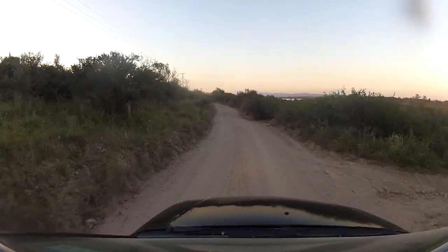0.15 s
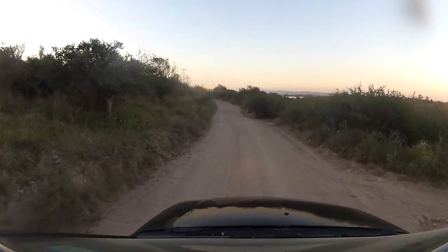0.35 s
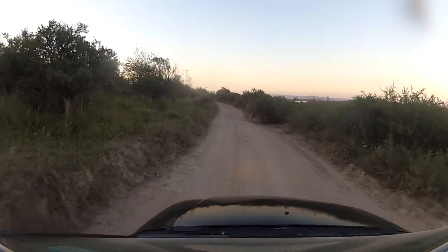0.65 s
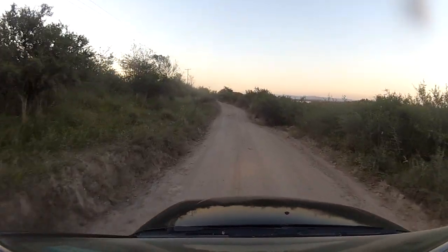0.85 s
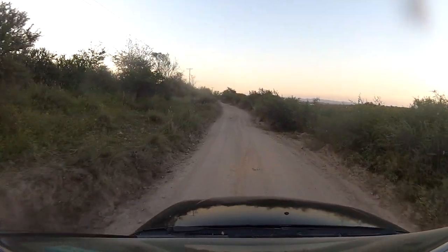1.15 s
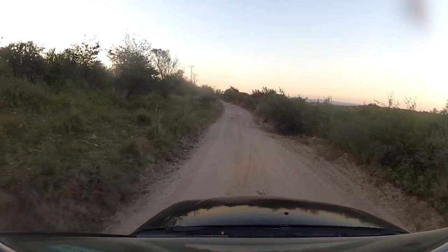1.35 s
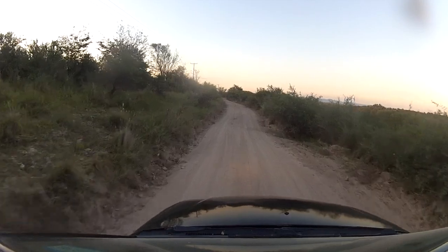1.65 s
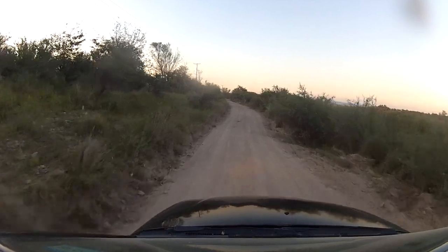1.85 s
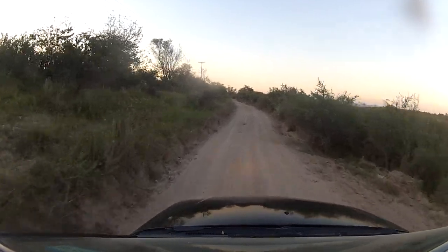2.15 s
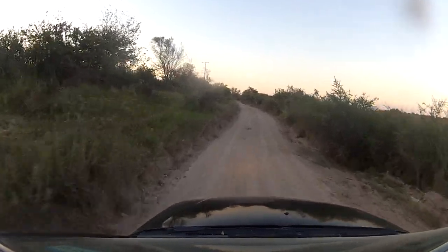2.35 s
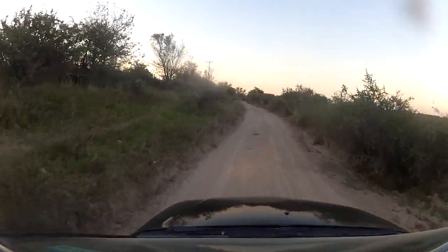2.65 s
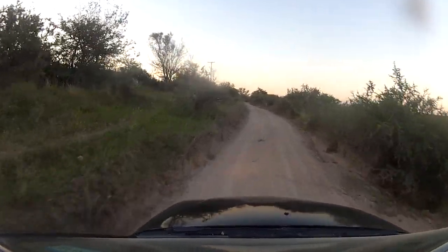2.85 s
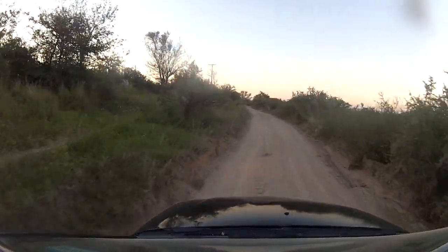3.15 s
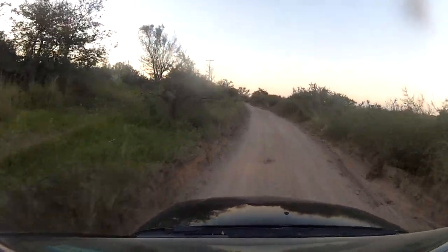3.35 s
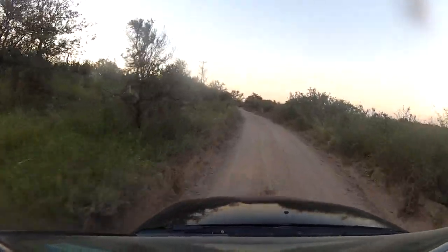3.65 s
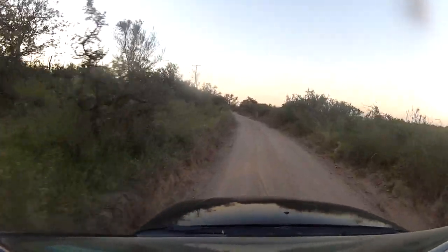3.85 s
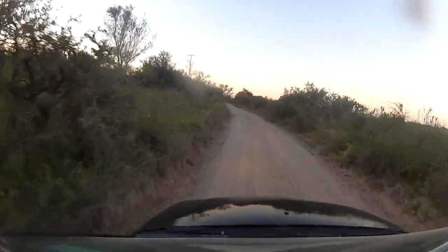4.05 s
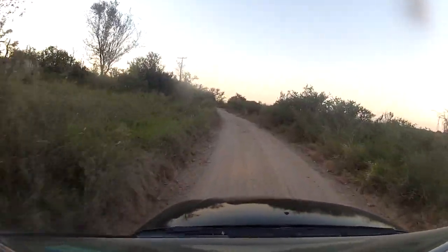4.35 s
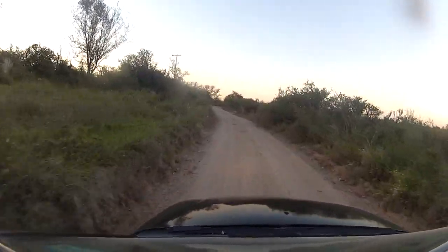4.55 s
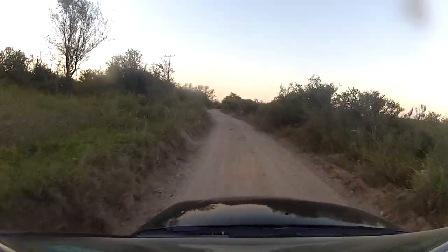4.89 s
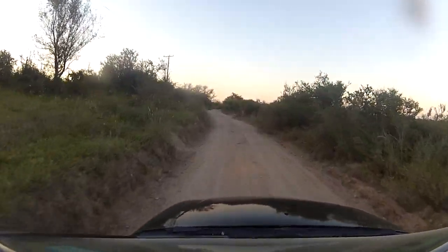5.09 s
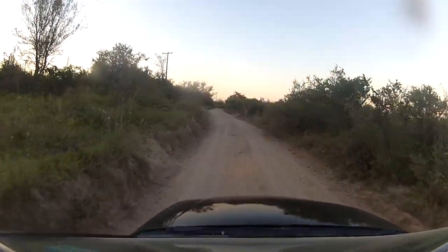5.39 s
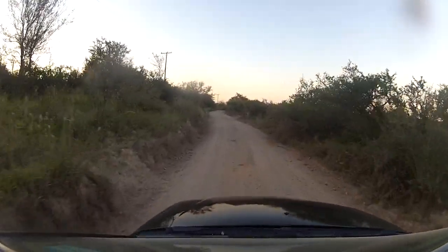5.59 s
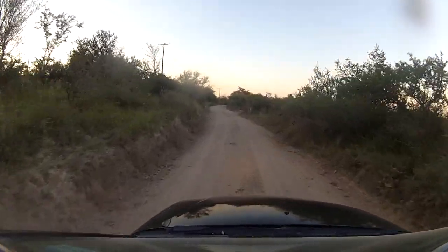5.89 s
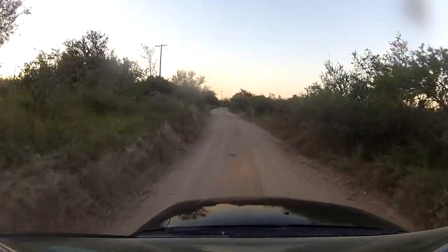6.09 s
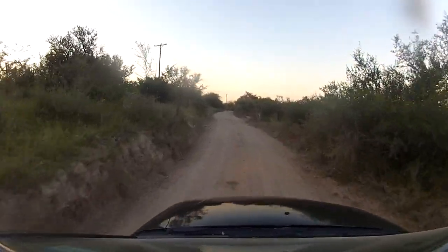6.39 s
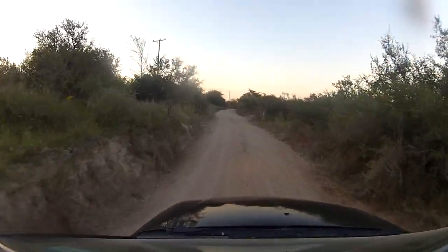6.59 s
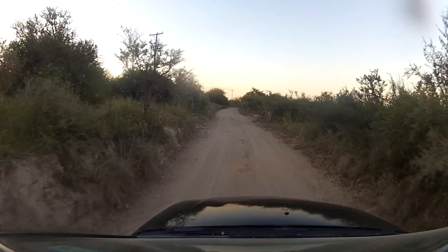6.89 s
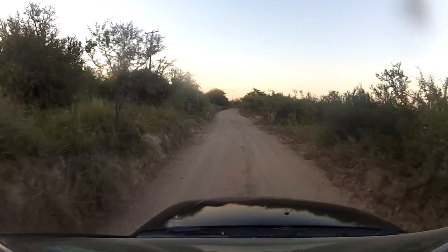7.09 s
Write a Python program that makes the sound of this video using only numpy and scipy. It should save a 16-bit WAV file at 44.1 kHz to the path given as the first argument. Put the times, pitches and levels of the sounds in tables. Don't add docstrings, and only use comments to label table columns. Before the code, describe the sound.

Close, boxy in-car sound of an unpaved road: violent hollow knocks at the start, steady rumble, faint tyre hiss, rapid case ticking and sharp single stone hits.

```python
import sys
import numpy as np
from scipy import signal
from scipy.io import wavfile
from scipy.ndimage import uniform_filter1d

SR = 44100
rng = np.random.default_rng(int(sys.argv[2]) if len(sys.argv) > 2 else 0)


def master_out(mix):
    frames = np.transpose(np.atleast_2d(mix))
    ceiling = np.clip(frames, -1, 1)
    pcm = np.round(ceiling * 32767).astype(np.int16)
    wavfile.write(sys.argv[1], SR, pcm)


def invert_db(level):
    return 10 ** (np.asarray(level, dtype=float) / 20)


N = 318843

# f/Hz, level/dB, t60/s
SHELL_MODES = [(643, 1, 0.05), (716, 8.5, 0.054), (930, 20, 0.046), (1110, -13, 0.019), (1300, 14, 0.045),
               (1600, 2, 0.0099), (2170, -19, 0.013)]
# t/s, peak level/dB, f/Hz
RUT_BLOWS = [(0.031, -19, 860), (0.1073, -18.5, 774), (0.1444, -9, 780), (0.1488, -2, 860),
             (0.1705, -6, 990), (0.2116, -12.5, 890), (0.2663, -25, 830), (0.3002, -28, 890),
             (0.3051, -6, 780), (0.3259, -10.5, 860), (0.4942, -7, 950), (0.4975, -1.5, 880),
             (0.5273, -5, 935), (0.5492, -24, 1050), (0.584, -16, 1010), (0.5886, -6, 765),
             (0.6008, -3, 930), (3.7345, -17.5, 910), (3.804, -12.5, 950), (3.809, -15, 745),
             (3.8227, -5.5, 950), (3.974, -37, 810), (3.9806, -13, 800), (3.9996, -13, 810),
             (4.0643, -8.5, 1040), (4.077, -12, 780), (4.081, -3.5, 990), (4.1023, -14, 1140),
             (4.107, -14.5, 770), (4.1202, -21, 814)]
# t/s, peak level/dB, f/Hz, 3.4 kHz ring level/dB
STONE_BLOWS = [(0.8477, -16.5, 1050, -34), (0.941, -20, 1050, -26.5), (1.2572, -22.5, 970, -37),
               (1.423, -13.5, 1290, -22.5), (1.505, -17.5, 795, -30), (1.7355, -18, 950, -27.5),
               (1.9978, -20, 950, -28), (2.1, -16, 990, -27.5), (2.643, -16, 1050, -25.5),
               (2.6781, -22, 1040, -30), (2.83, -9.5, 1090, -31.5), (2.9196, -16, 970, -27.5),
               (3.2912, -7, 1130, -26), (3.5688, -13, 1110, -25), (3.577, -25, 960, -39),
               (5.363, -10, 1030, -28.5), (5.5427, -10.5, 1020, -27.5), (5.6612, -5.5, 1050, -20),
               (5.7003, -10, 1050, -38), (5.916, -19, 1040, -40), (6.1522, -12.5, 990, -23.5),
               (6.2874, -20.5, 930, -41), (6.3509, -10.5, 1070, -32), (6.388, -15, 1110, -25),
               (6.3928, 0, 930, -17.5), (6.4222, -13, 910, -50), (6.628, -21, 950, -33),
               (6.7662, -11.5, 990, -37), (7.2168, -18.5, 1000, -28.5)]
# t/s, peak level/dB, f/Hz
FURTHER_BLOWS = [(0.19, -21, 900), (0.1955, -21, 800), (0.5622, -23, 900), (2.8401, -25.5, 900), (4.16, -23, 1030),
                 (4.216, -24.5, 910), (4.44, -40, 1486), (4.582, -35, 1600), (4.804, -30.5, 1290),
                 (6.365, -25, 800), (6.394, -4, 870), (0.164, -29, 650), (0.577, -31, 700), (3.688, -27, 800),
                 (3.764, -27, 900), (3.579, -23, 700), (4.514, -29, 700), (5.006, -26, 1000), (3.563, -31, 900),
                 (4.138, -34, 800)]


def knocks():
    sag_per_s = 17
    thud_hz, thud_db, thud_s = 300, -17, 0.002
    full_ring_db = -8.5
    out = np.zeros(N)
    blows = RUT_BLOWS + [row[:3] for row in STONE_BLOWS] + FURTHER_BLOWS
    chance = rng.standard_normal((len(blows), 14))
    t = np.arange(-150, 250) / SR
    after = np.arange(800) / SR
    bell = np.exp(-(t / np.where(t < 0, 0.00058, 0.00085)) ** 2)
    thud = -np.sin(2 * np.pi * thud_hz * after) * np.exp(-after / thud_s)
    for (at_s, level_db, pitch_hz), c in zip(blows, chance):
        blow = -bell * np.cos(2 * np.pi * pitch_hz * t * (1 - sag_per_s * t) + 0.35 * c[6])
        sharpness = 25 * np.log2(pitch_hz / 900)
        shell = [(hz, db + sharpness * np.log2(hz / 900), t60_s) for hz, db, t60_s in SHELL_MODES]
        tail = ring(shell, c, detune=0.025, spread_db=3)
        add(out, at_s - 150 / SR, invert_db(level_db + 1.5) * blow)
        add(out, at_s + 0.00069, invert_db(level_db + thud_db) * thud)
        add(out, at_s + 0.00043, invert_db(min(level_db, full_ring_db) + 8.0) * tail)
    return out


# f/Hz, level/dB, t60/s
CLACK_MODES = [
    [(3413, 2.5, 0.0063), (3900, -11, 0.014)],
    [(4860, 5, 0.0058), (4900, -10, 0.005)],
    [(1280, 9, 0.017), (1630, 15.5, 0.0081), (1954, 17, 0.0099), (2795, 1, 0.029)],
]


def clacks():
    out = np.zeros(N)
    rows = hard_contacts()
    chance, grit = rng.standard_normal((len(rows), 8)), rng.standard_normal((len(rows), 300))
    for (at_s, mid_db, high_db, low_db), c, g in zip(rows, chance, grit):
        force = touches(g, gap_s=0.0012, rebound_db=-15, grit_db=-30)
        levels_db = (mid_db + 8.5, mid_db + high_db + 9.0, mid_db + low_db + 2.0)
        for modes, level_db in zip(CLACK_MODES, levels_db):
            part = signal.oaconvolve(force, ring(modes, c, detune=0.008, spread_db=2))
            add(out, at_s - 0.0016, invert_db(level_db) * part / abs(part).max())
    return out


# t/s, 3.4 kHz ring level/dB, 4.8 kHz ring above it/dB, lower ring above it/dB
LOOSE_CLACKS = [(0.0315, -37, 3, 0), (0.1152, -35.5, 0, 22), (0.1243, -20, -10, -2), (0.148, -22, 10, 16),
                (0.1702, -29.5, -14, 21), (0.3242, -32.5, -4, 14), (0.494, -17, -6, 7),
                (0.528, -28, -7, 17.5), (0.5494, -26.5, -5, 11), (0.5833, -25.5, -5, 9.5),
                (0.5992, -31.5, 1, 17.5), (2.2057, -35.5, -6, 11.5), (2.879, -35.5, -15, 13.5),
                (3.7276, -31, -16, 11.5), (3.8207, -31.5, -2, 17), (3.9476, -40, 7.5, 21.5),
                (3.9745, -32, -3, 6), (4.0265, -45, -3, -2), (4.0631, -27.5, 7, 13.5), (4.0805, -30, 4, 17),
                (4.1021, -28, -2, 5), (4.514, -33, -17, 9.5), (5.0238, -33, -8, 13), (5.381, -37.5, 8, 15),
                (5.4618, -40, 5, 14), (6.2164, -33, -9, 6), (6.2976, -32.5, -3, 11),
                (6.8237, -34, -18.5, 10)]


def hard_contacts():
    lead_s, mean_ring_db = -0.00028, -32
    at_s, _, _, mid_db = np.transpose(STONE_BLOWS)
    below_db = mean_ring_db - mid_db
    high_db = -1.5 + 0.23 * below_db
    low_db = 12.5 + 0.39 * below_db
    return np.concatenate([LOOSE_CLACKS, np.transpose([at_s - lead_s, mid_db, high_db, low_db])])


# f/Hz, level/dB, t60/s
TICK_MODES = [(950, -11.5, 0.028), (1764, 4.5, 0.0043), (2015, -7.5, 0.011), (2956, 2.5, 0.003),
              (3950, 7.5, 0.0018), (4570, -7.5, 0.0013)]


def ticks():
    out, rows = np.zeros(N), light_contacts()
    chance, grit = rng.standard_normal((len(rows), 12)), rng.standard_normal((len(rows), 300))
    for (at_s, level_db), c, g in zip(rows, chance, grit):
        force = touches(g, gap_s=0.0022, rebound_db=-11, grit_db=-28)
        click = signal.oaconvolve(force, ring(TICK_MODES, c, detune=0.012, spread_db=1.5))
        add(out, at_s - 0.0014, invert_db(level_db + 27.0) * click)
    return out


# t/s, peak level/dB
RUTTED_TICKS = [(0.027, -38), (0.042, -42.4), (0.075, -39.5), (0.082, -38.5), (0.105, -40), (0.1407, -34),
                (0.1908, -38), (0.199, -52), (0.212, -40), (0.2427, -35), (0.266, -36.5), (0.2775, -50),
                (0.2992, -36), (0.346, -45), (0.371, -38), (0.4106, -36.5), (0.4383, -48), (0.45, -37),
                (0.567, -35), (0.625, -38), (0.648, -37), (0.6716, -49), (0.6898, -37.5), (0.7116, -48),
                (0.7266, -38.5), (0.7722, -40), (0.807, -35.5), (0.8597, -44), (0.899, -36.5), (0.932, -41),
                (0.9558, -39.5), (0.964, -51.4), (0.991, -47), (1.025, -52), (1.062, -38), (1.074, -40),
                (1.1031, -55), (1.1127, -43), (1.152, -43.5), (1.179, -38.5), (1.1957, -44),
                (1.2296, -52.3), (1.2408, -42), (1.275, -38.5), (1.3123, -39), (1.355, -41), (1.436, -41),
                (1.4575, -57), (1.476, -37.5), (1.521, -36.5), (1.5456, -57), (1.5595, -36), (1.592, -37.5),
                (1.6165, -42), (1.6301, -38.5), (1.6754, -44), (1.7075, -48.8), (1.7476, -49),
                (1.7715, -36.5), (1.804, -49)]
MIDDLE_TICKS = [(1.8266, -51), (1.8413, -47), (1.857, -50), (1.8795, -41), (1.8992, -41), (1.9086, -38),
                (1.9576, -42), (1.9773, -38.5), (2.0212, -38), (2.043, -42.5), (2.0568, -46), (2.1247, -43),
                (2.135, -53.9), (2.144, -41.3), (2.1616, -53.4), (2.171, -44.5), (2.2176, -36.5),
                (2.2521, -51.5), (2.288, -45), (2.3078, -48), (2.3398, -37.5), (2.3746, -39.5),
                (2.4082, -42.5), (2.4538, -47.5), (2.47, -49), (2.4943, -44), (2.5317, -48), (2.572, -42.5),
                (2.6075, -40.5), (2.6341, -53.5), (2.656, -43), (2.6913, -51.6), (2.7526, -39.5),
                (2.801, -45), (2.824, -47), (2.843, -38), (2.863, -47), (2.928, -43), (2.9612, -40),
                (2.9814, -45), (2.99, -41), (3.022, -49), (3.0464, -39), (3.0707, -47), (3.0905, -37.5),
                (3.1082, -48), (3.1208, -49), (3.1486, -44), (3.1905, -39.5), (3.208, -49), (3.2257, -38.5),
                (3.265, -38.1), (3.306, -35.5), (3.3218, -53.0), (3.3337, -48), (3.3486, -50), (3.362, -46),
                (3.4052, -39), (3.4169, -36), (3.4592, -42.5)]
WASHBOARD_TICKS = [(3.4827, -49), (3.4987, -36.5), (3.5417, -40), (3.586, -42), (3.598, -39),
                   (3.6178, -34.5), (3.688, -54), (3.6975, -37), (3.7387, -34.5), (3.7696, -37),
                   (3.7805, -36.5), (3.803, -33.5), (3.8127, -42), (3.8466, -51), (3.858, -40.5),
                   (3.8874, -48), (3.8956, -46.6), (3.9063, -47), (3.921, -39.5), (3.991, -37.5),
                   (4.0002, -42), (4.052, -37), (4.073, -33), (4.1178, -42), (4.215, -45.5), (4.2253, -42),
                   (4.3394, -42.5), (4.372, -49), (4.3859, -41), (4.415, -41.5), (4.459, -52),
                   (4.4861, -38.5), (4.5054, -40), (4.5229, -37.5), (4.5443, -46), (4.5615, -39.5),
                   (4.5985, -39), (4.6237, -51), (4.6446, -36.5), (4.674, -49), (4.6815, -47),
                   (4.7032, -58), (4.7184, -37.5), (4.754, -42), (4.872, -41), (4.9023, -38.5),
                   (4.9274, -47), (4.9468, -39.5), (4.9649, -47), (4.982, -36.5), (5.006, -36.5),
                   (5.0457, -43), (5.0535, -48), (5.0658, -36.5), (5.1622, -41), (5.1931, -44.5),
                   (5.244, -39.5), (5.2888, -41.5), (5.306, -48), (5.3373, -37.5)]
STONY_TICKS = [(5.356, -43), (5.4215, -36), (5.5142, -42.2), (5.535, -49), (5.5619, -39), (5.6332, -38.5),
               (5.6436, -48), (5.6765, -35.5), (5.6938, -46), (5.7117, -42.5), (5.739, -34), (5.7563, -36),
               (5.7863, -48), (5.804, -48), (5.833, -44), (5.847, -35.5), (5.8592, -55), (5.9256, -36.5),
               (5.951, -41), (5.965, -39), (5.9983, -50.8), (6.009, -38.5), (6.0285, -44), (6.0445, -34.5),
               (6.0954, -42), (6.1232, -40), (6.1676, -40), (6.187, -41), (6.239, -43), (6.25, -45),
               (6.2625, -37.5), (6.2797, -42), (6.322, -38), (6.369, -30), (6.443, -51), (6.4525, -41.5),
               (6.4759, -59), (6.4823, -40.5), (6.521, -39.5), (6.571, -38.5), (6.5947, -50),
               (6.6503, -38.4), (6.7016, -34), (6.729, -35), (6.74, -36), (6.781, -33.5), (6.8042, -44),
               (6.81, -39), (6.845, -43), (6.861, -43), (6.898, -40), (6.9416, -43), (7.006, -44),
               (7.0277, -46), (7.043, -39), (7.0635, -45), (7.0843, -42.5), (7.16, -37.5), (7.1713, -40),
               (7.1967, -43.5)]


def light_contacts():
    same_swing_s = 0.005
    at_s, _, level_db = forward_swings().T
    struck = abs(at_s[:, None] - hard_contacts()[:, 0]).min(1) < same_swing_s
    under_clacks = np.transpose([at_s, level_db])[struck]
    return np.concatenate([under_clacks, RUTTED_TICKS, MIDDLE_TICKS, WASHBOARD_TICKS, STONY_TICKS])


# start t/s, swing f/Hz, tick count, level/dB
TICK_RUNS = [(0.0309, 23.68, 10.0, -37.0), (0.4504, 23.13, 2.0, -30.0), (0.5275, 24.52, 5.0, -36.0),
             (0.7718, 27.58, 9.0, -38.0), (1.1131, 24.81, 10.0, -40.5), (1.5209, 27.91, 11.0, -38.5),
             (1.9776, 24.03, 5.0, -38.5), (2.171, 29.43, 8.0, -41.0), (2.4949, 27.16, 8.0, -40.0),
             (2.8005, 24.86, 5.0, -39.5), (3.0469, 22.81, 2.0, -36.5), (3.1489, 25.31, 5.0, -36.5),
             (3.4172, 24.16, 4.0, -38.5), (3.5862, 32.1, 2.0, -38.5), (3.6979, 24.08, 7.0, -37.0),
             (3.99, 26.82, 4.0, -32.5), (4.3395, 26.96, 8.0, -38.5), (4.6449, 27.76, 4.0, -38.0),
             (4.9027, 22.62, 2.0, -38.5), (4.9819, 23.77, 3.0, -37.5), (5.2444, 22.06, 4.0, -39.0),
             (5.4216, 25.22, 9.0, -36.5), (5.8478, 25.44, 6.0, -36.5), (6.1241, 21.68, 4.0, -38.0),
             (6.3218, 21.29, 2.0, -35.0), (6.4191, 31.59, 3.0, -44.0), (6.571, 25.29, 3.0, -37.0),
             (6.7012, 25.06, 5.0, -37.0), (6.8981, 22.87, 2.0, -42.5), (7.0053, 26.05, 6.0, -41.0)]


def forward_swings():
    return np.array([(start_s + k / swing_hz, 1 / swing_hz, level_db)
                     for start_s, swing_hz, count, level_db in TICK_RUNS for k in range(int(count))])


# t/s, level/dB, width/s
MOUNT_BUMPS = [(0.029, -13, 0.062), (0.123, -8.5, 0.041), (0.405, -24.5, 0.25), (0.573, -23.5, 0.058),
               (0.737, -19.5, 0.15), (1.39, -26, 0.53), (1.629, -16, 0.057), (1.818, -20, 0.092),
               (2.107, -18.5, 0.12), (2.441, -26, 0.17), (2.906, -22.5, 0.12), (3.015, -24.5, 0.18),
               (3.257, -21.5, 0.096), (3.535, -16, 0.07), (3.756, -15.5, 0.049), (3.892, -15, 0.23),
               (4.027, -13.5, 0.051), (4.325, -21.5, 0.096), (4.532, -15, 0.056), (4.659, -18, 0.13),
               (5.013, -14.5, 0.14), (5.435, -19.5, 0.17), (5.697, -19.5, 0.046), (5.896, -20, 0.057),
               (6.024, -19.5, 0.048), (6.151, -21, 0.043), (6.242, -20, 0.031), (6.359, -22, 0.11),
               (6.781, -18, 0.16), (7.078, -21.5, 0.1)]


def mount():
    swing_hz, rest_db, tick_phase_rad, lump_db = 26, -43, 0.05, 1.6
    t, at_s = np.arange(N) / SR, forward_swings()[:, 0]
    at_s = np.concatenate([[at_s[0] - 1], at_s, [at_s[-1] + 1]])
    whole_turns = np.cumsum(np.round(np.diff(at_s, prepend=at_s[0]) * swing_hz))
    turns = np.interp(t, at_s, whole_turns)
    drift = uniform_filter1d(turns - swing_hz * t, size=1500)
    phase = 2 * np.pi * (swing_hz * t + drift) + tick_phase_rad
    power = invert_db(rest_db) ** 2
    for bump_s, level_db, width_s in MOUNT_BUMPS:
        power = power + invert_db(2 * level_db) * np.exp(-2 * ((t - bump_s) / width_s) ** 2)
    bend = invert_db(-22) * np.sin(2 * phase)
    lumps = rng.standard_normal(N)
    lumps = evened(uniform_filter1d(uniform_filter1d(lumps, size=2000), size=2000))
    return np.sqrt(2 * power) * invert_db(lump_db * lumps) * (np.sin(phase) + bend)


# t/s, level/dB, length/s
PANEL_MOANS = [(1.2, -47, 0.049), (3.8, -42, 0.055), (3.9, -53, 0.049), (4.7, -56, 0.01), (1, -51, 0.083),
               (4, -46.5, 0.054), (4.34, -42, 0.031), (3.53, -51, 0.036), (5.0, -42, 0.028),
               (4.5, -47, 0.035)]
# t/s, level/dB, length/s
PAN_GROWLS = [(1.15, -39.5, 0.059), (2.0, -47, 0.036), (2.97, -41.5, 0.085), (3.35, -42, 0.047),
              (3.58, -38, 0.091), (4.1, -47, 0.13), (4.27, -44.5, 0.066), (5.78, -49, 0.073),
              (6.1, -46, 0.087)]
# t/s, level/dB, length/s
CABIN_BOOMS = [(0.135, -26, 0.075), (0.463, -36.5, 0.07), (0.659, -34.5, 0.13), (1.138, -38, 0.056),
               (1.839, -34, 0.095), (2.129, -32.5, 0.12), (2.755, -38, 0.066), (3.089, -35.5, 0.049),
               (3.507, -37.5, 0.2), (3.9, -35.5, 0.14), (4.237, -27.5, 0.062), (4.725, -34, 0.069),
               (5.012, -31, 0.03), (5.321, -42, 0.19), (5.69, -36, 0.055), (5.915, -34.5, 0.1),
               (6.057, -55, 0.03), (6.32, -42, 0.11), (6.77, -38, 0.062)]


def moans():
    panel_hz_db = [(500, -22), (690, 0), (900, -20)]
    pan_hz_db = [(130, -23), (200, 12.0), (290, 0.5), (420, -6.5)]
    air_hz_db = [(70, -16), (98, 0), (122, -16)]
    panel = swells(PANEL_MOANS) * wash(panel_hz_db, patchy_db=2.5, flicker_db=1.5, size=1024)
    pan = swells(PAN_GROWLS) * wash(pan_hz_db, patchy_db=5, flicker_db=2.5, size=1024)
    air = swells(CABIN_BOOMS) * wash(air_hz_db, patchy_db=1, flicker_db=1, size=4096)
    return panel + pan + air


# f/Hz, density/(dB per Hz)
RUMBLE_SPECTRUM = [(12, -40), (20, -0.5), (38, -2.5), (52, 2.5), (72, -10), (98, -6.5), (125, -13),
                   (190, -14.5), (260, -24), (450, -32.5), (900, -108)]
DRONE_SPECTRUM = [(300, -31), (450, -9), (680, 8.5), (810, -34), (940, 2), (1200, -5.5), (1600, -13),
                  (2500, -37)]
HISS_SPECTRUM = [(900, -17), (1500, -21.5), (2040, -6.5), (2400, -9), (2900, -9.5), (3250, -29.5),
                 (4200, -23.5), (5900, -25.5)]
# t/s, body rumble level/dB
ROUGHNESS = [(0.0, -27.5), (0.14, -22.5), (0.4, -29), (0.78, -30), (2.3, -31.5), (3.24, -30.5), (3.54, -25),
             (3.68, -32), (3.94, -22.5), (4.16, -27.5), (4.38, -30), (4.84, -34), (5.0, -31), (5.22, -33.5),
             (5.7, -30), (6.36, -29), (6.48, -30.5), (7.22, -32)]
# t/s, hiss level/dB
TYRE_GRIT = [(0.0, -45.5), (0.14, -41.5), (0.56, -43), (0.78, -42.5), (1.1, -41.5), (2.22, -46), (2.5, -45),
             (3.3, -51.5), (3.68, -53.5), (3.94, -49.5), (4.04, -44), (4.16, -53), (4.56, -49.5),
             (4.84, -54), (5.2, -48), (6.36, -43), (6.5, -42), (7.06, -42.5)]
# t/s, level/dB, length/s
GRAVEL_SPRAYS = [(2.5, -59, 0.11), (3.655, -49.5, 0.06), (5.2, -53, 0.06)]


def road():
    drone_below_rumble_db = 16
    rough_db = curve(ROUGHNESS, order=1)
    rumble = invert_db(rough_db) * wash(RUMBLE_SPECTRUM, patchy_db=1.9, flicker_db=1.1, size=4096)
    drone_level = invert_db(rough_db - drone_below_rumble_db)
    drone = drone_level * wash(DRONE_SPECTRUM, patchy_db=2.1, flicker_db=3.5, size=512)
    hiss_level = invert_db(curve(TYRE_GRIT, order=1)) + swells(GRAVEL_SPRAYS)
    hiss = hiss_level * wash(HISS_SPECTRUM, patchy_db=1.5, flicker_db=3.0, size=512)
    return rumble + drone + hiss


def self_noise():
    return invert_db(-62) * rng.standard_normal(N)


def touches(chance, gap_s, rebound_db, grit_db):
    t = np.arange(300) / SR
    first = 50
    force = invert_db(grit_db) * chance * t / 0.00082 * np.exp(1 - t / 0.0014)
    force[first] += 1
    for k in (1, 2):
        delay_s = k * gap_s * (1 + 0.12 * np.clip(chance[k], -2, 2))
        force[first + int(delay_s * SR)] += invert_db(k * rebound_db + 0.63 * chance[-k])
    return force


def ring(modes, chance, detune, spread_db):
    rise_s = 0.00018
    t = np.arange(2600) / SR
    hz, db, t60_s = np.transpose(modes)[:, :, None]
    u, v = chance[:len(modes), None], chance[-len(modes):, None]
    decay = invert_db(db + spread_db * v - 60 * t / t60_s)
    sound = (decay * np.sin(2 * np.pi * hz * (1 + detune * u) * t)).sum(0)
    sound *= 1 - np.exp(-t / rise_s)
    return sound / np.linalg.norm(sound)


def wash(spectrum, patchy_db, flicker_db, size):
    frames, hz = 4 * N // size + 5, np.fft.rfftfreq(size, 1 / SR)
    a, b, patches = rng.standard_normal((frames, len(hz), 3)).T
    patches = evened(uniform_filter1d(uniform_filter1d(patches, size=5, axis=0), size=8, axis=1))
    f, db = np.transpose(spectrum)
    shape_db = np.interp(np.log(hz + 1), np.log(f), db, left=-90, right=-90)
    flicker = flicker_db * rng.standard_normal(frames)
    z = (a + 1j * b) * invert_db(shape_db[:, None] + patchy_db * patches + flicker)
    return evened(signal.istft(z, nperseg=size, noverlap=3 * size // 4)[1][:N])


def swells(rows):
    t = np.arange(N) / SR
    return sum(invert_db(db) * np.exp(-((t - at_s) / length_s) ** 2) for at_s, db, length_s in rows)


def curve(rows, order):
    table = np.array(rows)
    return np.interp(np.arange(N) / SR, table[:, 0], table[:, order])


def evened(x):
    return x / np.sqrt(np.mean(x ** 2) + 1e-20)


def add(mix, at_s, sound):
    part = mix[max(round(at_s * SR), 0):][:len(sound)]
    part += sound[:len(part)]


def scene():
    return (knocks() + clacks() + ticks() + mount() + moans() + road() + self_noise())[None]


def top_cut(x):
    return signal.sosfilt(signal.butter(12, 16450, fs=SR, output="sos"), x)


def record(dry):
    sample_edge_hz, top_hz = 4260, 15350
    smooth = signal.sosfilt(signal.butter(4, sample_edge_hz, fs=SR, output="sos"), dry)
    slow = np.clip(signal.resample_poly(smooth, 40, 147, axis=1), -1.02, 1.02)
    held = np.repeat(slow, 4, axis=1)
    stepped = signal.resample_poly(held, 147, 160, axis=1)[:, 9:]
    stepped = np.pad(stepped, ((0, 0), (0, N)))[:, :N]
    limited = signal.oaconvolve(stepped, signal.firwin(115, top_hz, fs=SR)[None], "same")
    return top_cut(limited)


dry = scene()
out = record(dry)
master_out(out)
```